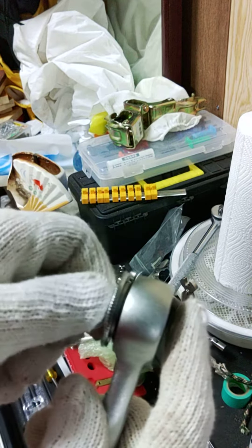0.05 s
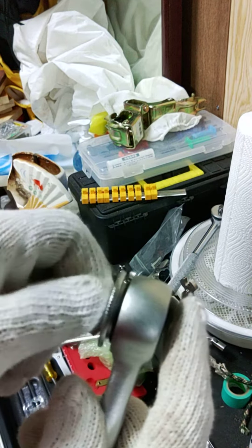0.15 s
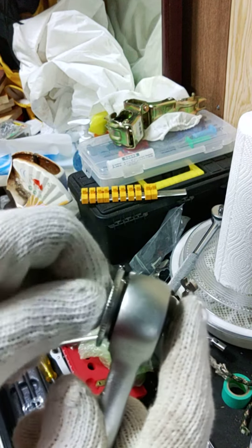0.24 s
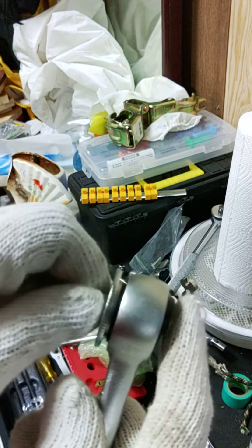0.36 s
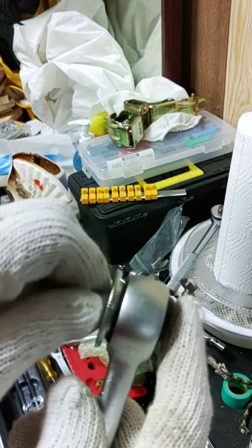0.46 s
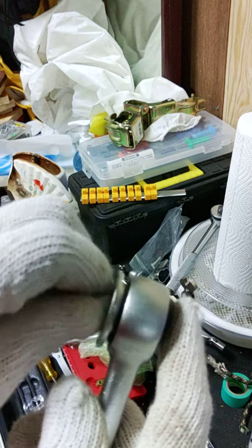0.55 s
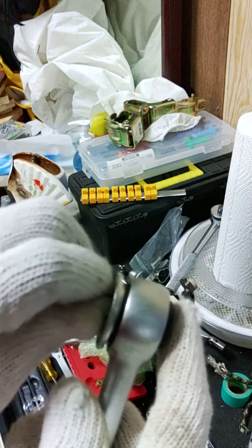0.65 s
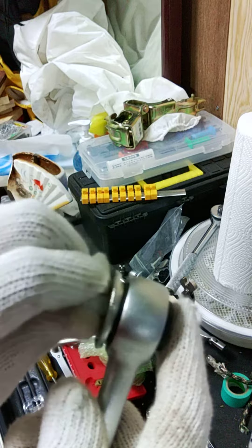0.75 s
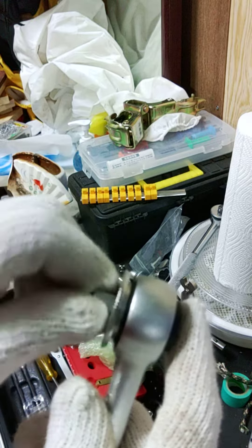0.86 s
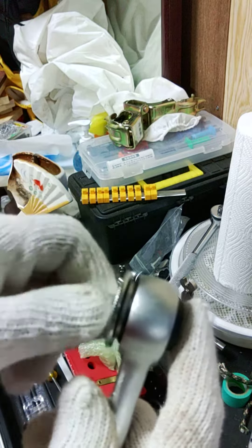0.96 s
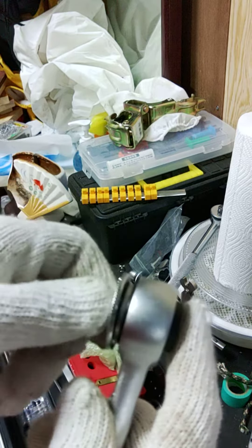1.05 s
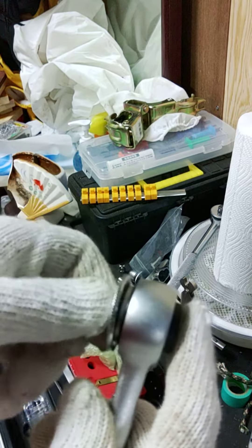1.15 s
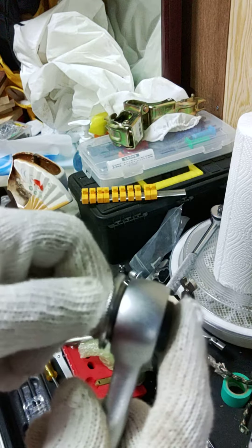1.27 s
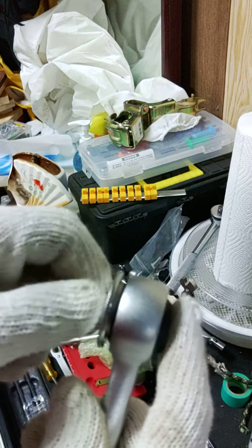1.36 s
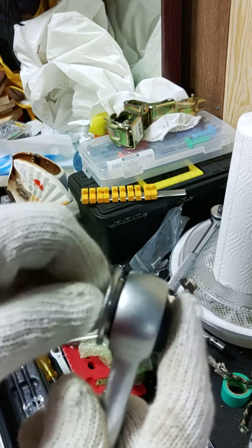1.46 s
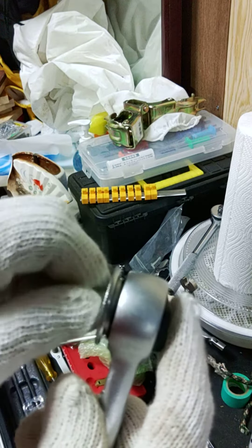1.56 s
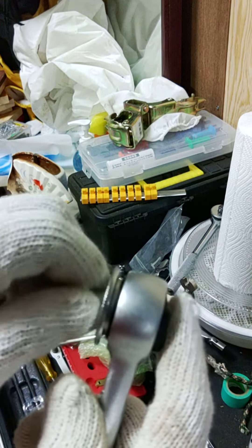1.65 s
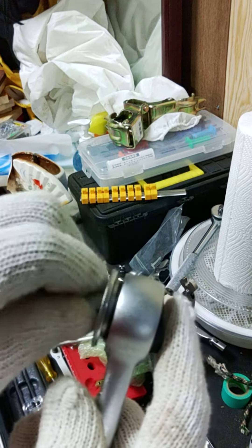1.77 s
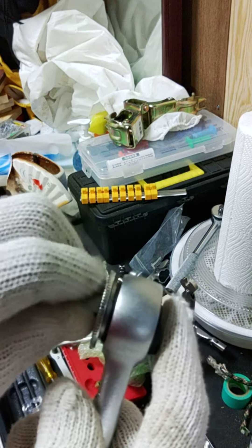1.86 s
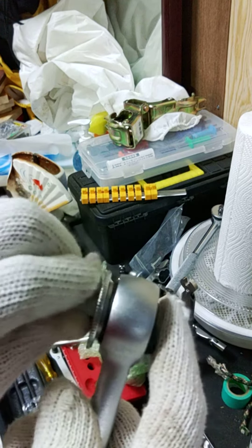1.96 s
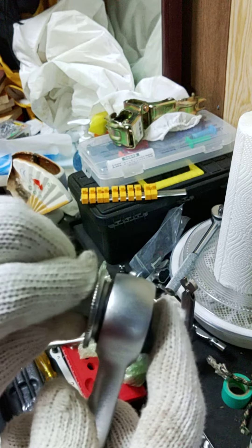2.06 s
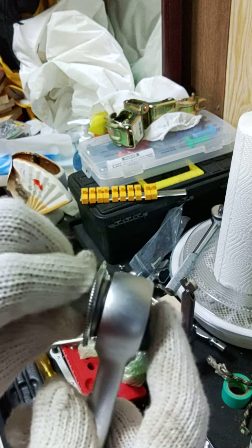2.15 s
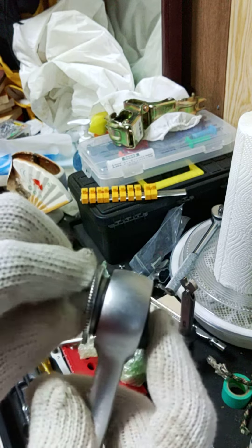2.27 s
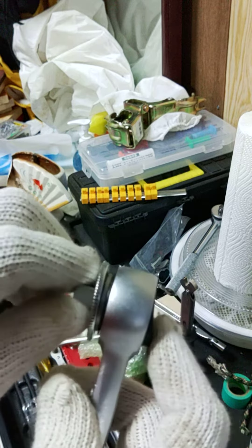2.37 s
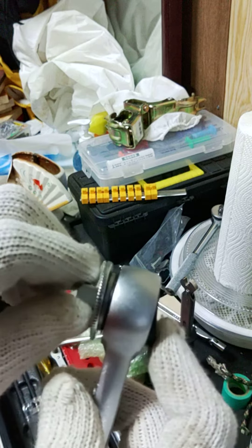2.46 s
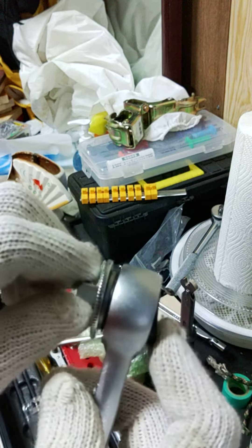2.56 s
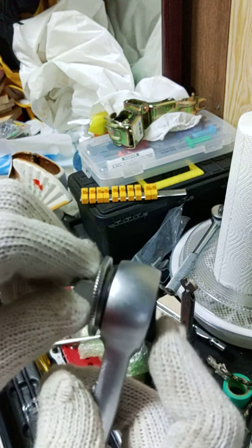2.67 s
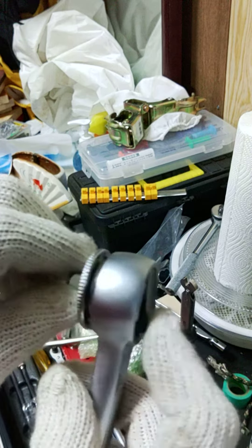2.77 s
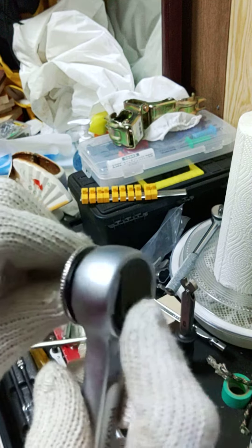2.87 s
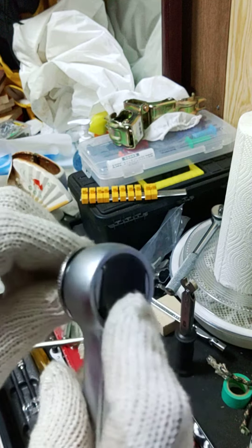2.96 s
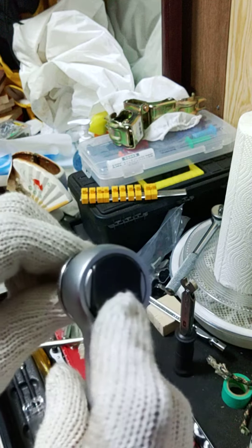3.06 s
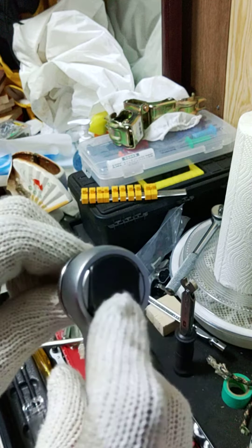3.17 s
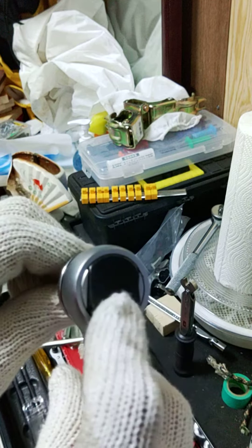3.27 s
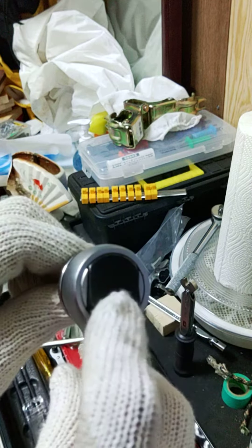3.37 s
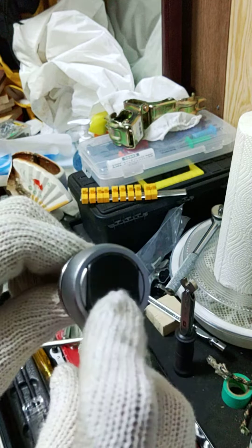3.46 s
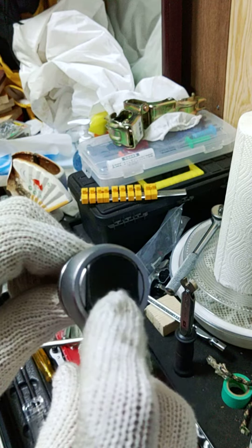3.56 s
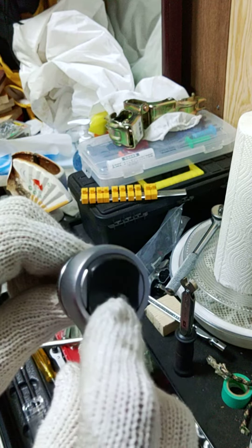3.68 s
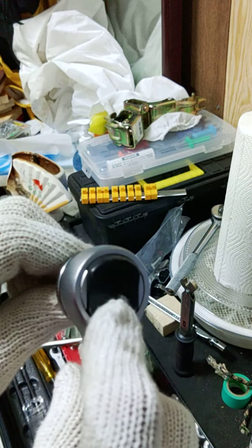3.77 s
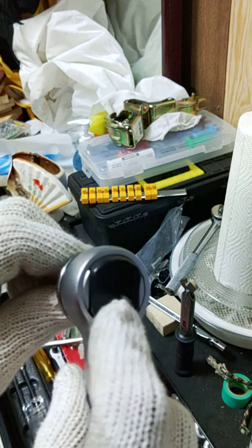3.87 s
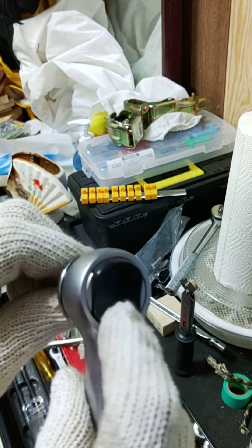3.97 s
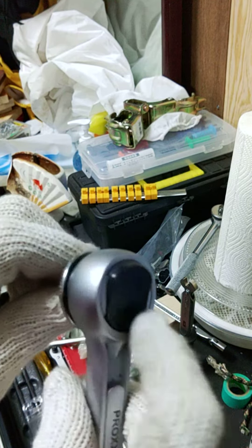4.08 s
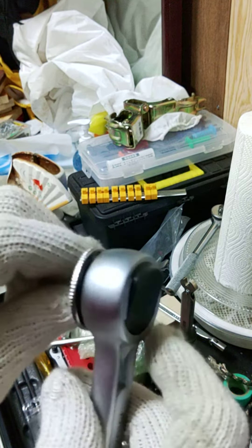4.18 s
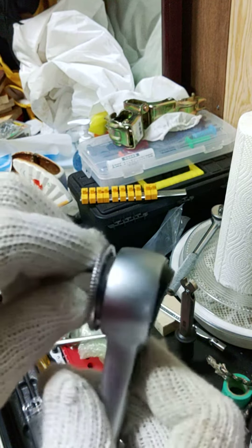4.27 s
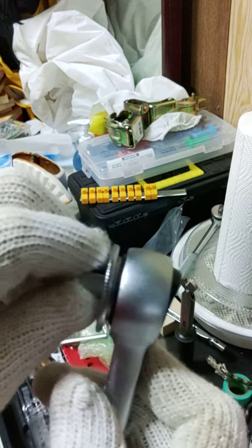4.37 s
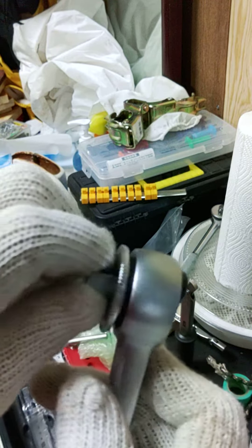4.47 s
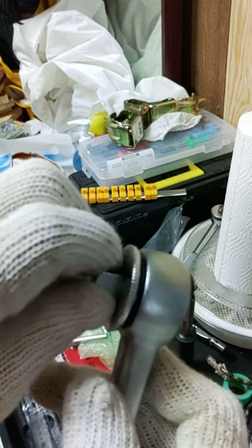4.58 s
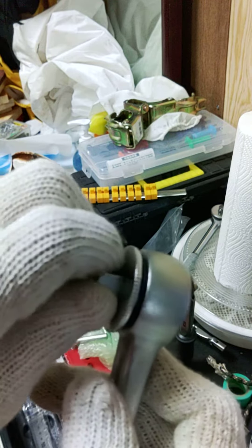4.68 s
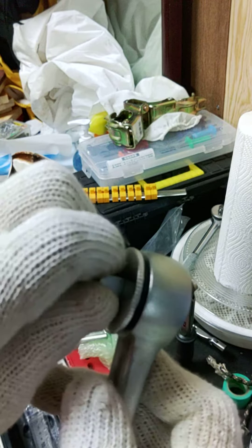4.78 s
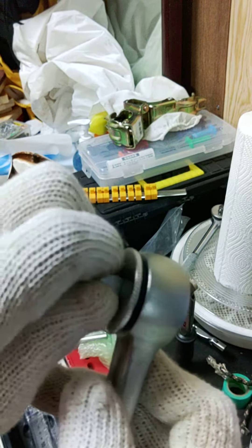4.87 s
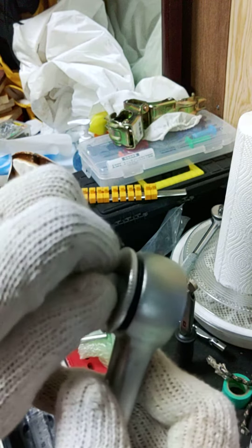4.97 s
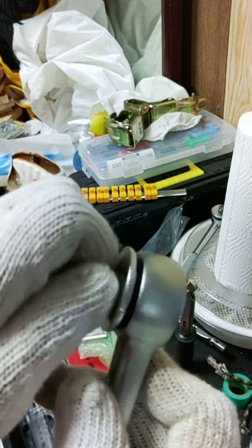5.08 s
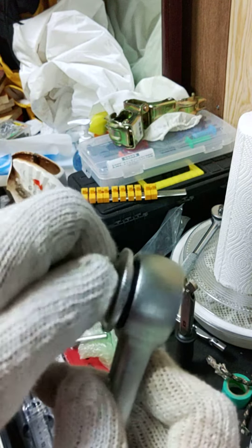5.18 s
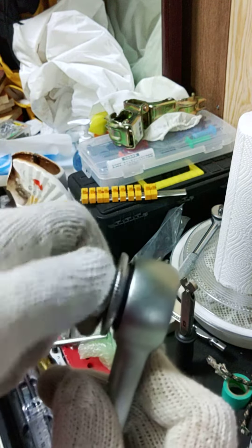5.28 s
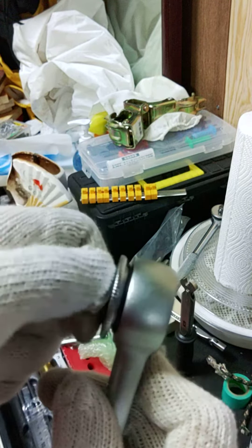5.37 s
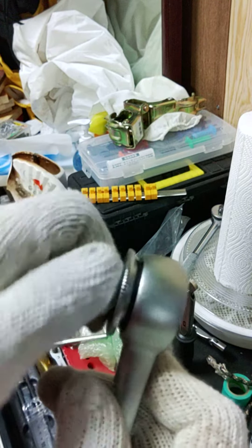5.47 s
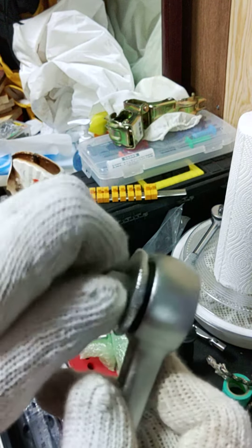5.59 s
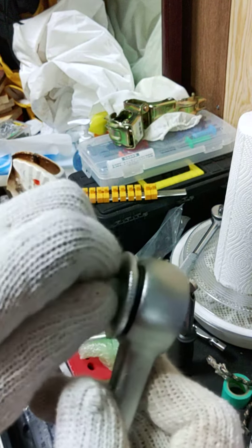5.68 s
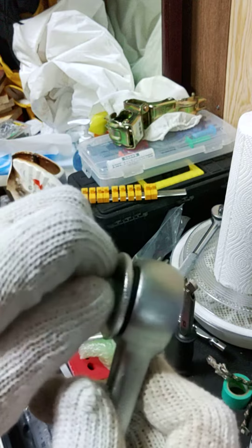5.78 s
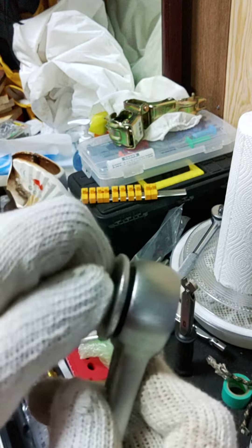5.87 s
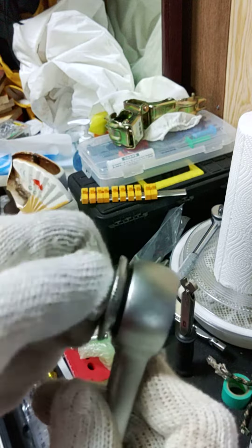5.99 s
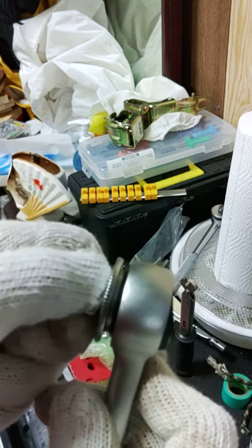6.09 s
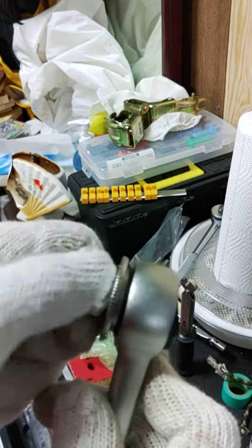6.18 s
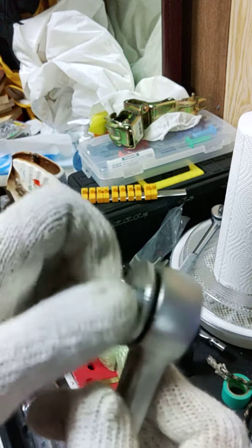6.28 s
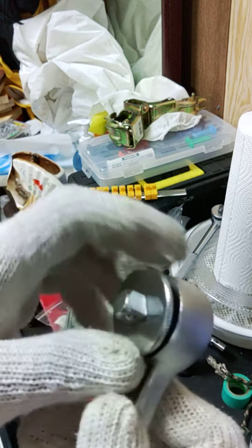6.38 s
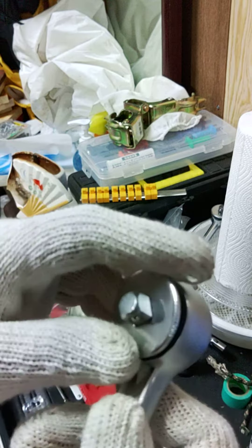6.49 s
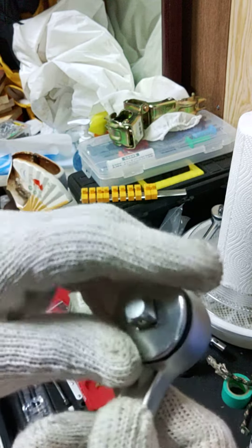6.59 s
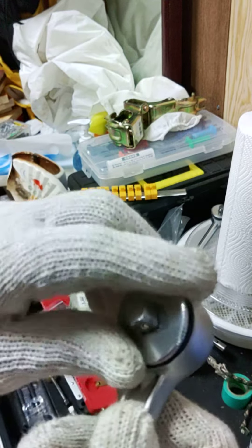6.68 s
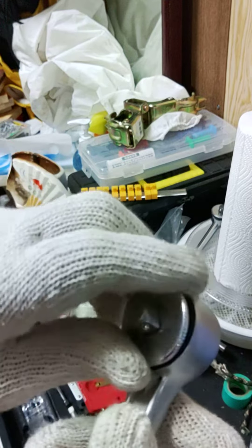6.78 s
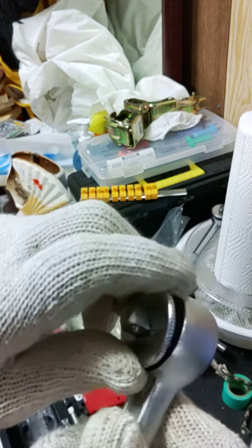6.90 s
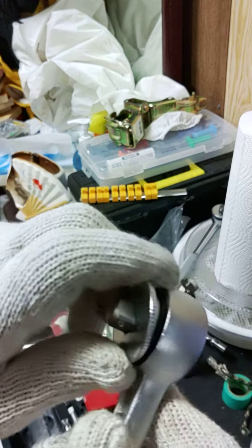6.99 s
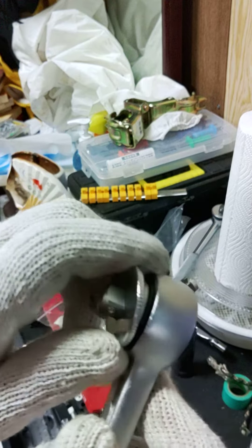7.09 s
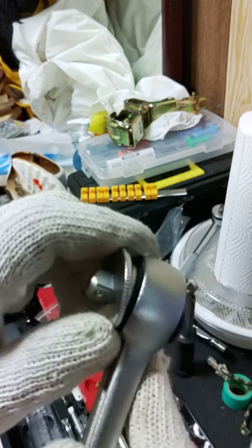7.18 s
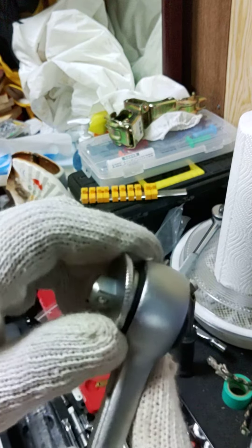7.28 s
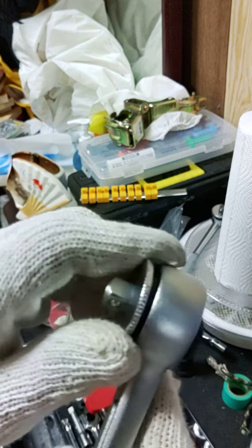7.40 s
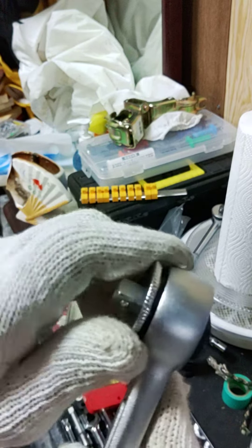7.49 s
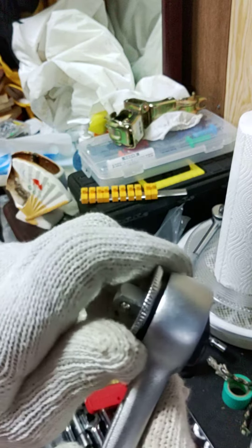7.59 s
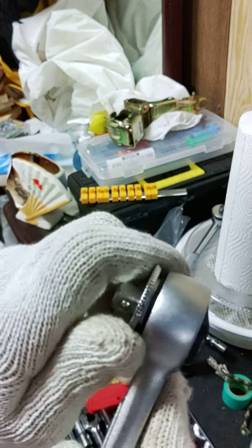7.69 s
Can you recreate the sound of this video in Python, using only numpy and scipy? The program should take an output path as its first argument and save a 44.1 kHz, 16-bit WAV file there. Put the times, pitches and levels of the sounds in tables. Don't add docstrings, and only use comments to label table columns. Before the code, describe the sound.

Crisp pawl clicks, dry and high with little body, arrive in five groups. The first two are moderate, around ten clicks each; after a hard double snap come a quickening run and a louder rapid one, then a pair at the end. Gloves rub softly on steel, air puffs low at the close microphone, and faint tyre roar rises outside the small cluttered room.

```python
import sys
import numpy as np
from scipy import signal
from scipy.fft import rfft, irfft
from scipy.io import wavfile
from scipy.ndimage import uniform_filter1d

SR = 44100
rng = np.random.default_rng(int(sys.argv[2]) if len(sys.argv) > 2 else 0)


def wav_record(signal):
    frames = np.transpose(np.atleast_2d(signal))
    bounded = np.clip(frames, -1, 1)
    quanta = np.round(bounded * 32767).astype(np.int16)
    wavfile.write(sys.argv[1], SR, quanta)


def invert_db(level):
    return 10 ** (np.asarray(level, dtype=float) / 20)


N = 341334

# frequency in Hz, level in dB.
AIR_COLOUR = [(4, 2.5), (12, 16), (25, -3.5), (45, -2), (70, -56)]
DRONE_COLOUR = [(35, 5.5), (60, 2), (120, -0.5), (190, -8.5), (280, -6), (450, -15), (650, -33)]
TYRE_COLOUR = [(350, 1), (600, 1.5), (780, 1), (920, 1), (1150, -0.5), (1800, -7.5), (3000, -18.5),
               (5000, -55.5)]
WHINE_COLOUR = [(780, -43), (880, -7.5), (950, -3), (1030, -5.5), (1150, -40)]
# centre in seconds, length in seconds, level in dB.
PUFFS = [(0.03, 0.2, -47), (.67, 0.027, -58), (2.25, 0.24, -58.5), (2.87, 0.12, -61), (3.5, 0.02, -52),
         (4.68, 0.086, -49.5), (5.62, .08, -46.5), (6.08, 0.064, -32), (6.26, 0.11, -35), (6.77, 0.15, -48),
         (7.55, 0.08, -42)]
# time in seconds, tyre roar in dB.
VEHICLE = [(0, -71), (1.5, -69.5), (2.8, -68.5), (4.0, -65), (4.9, -60.5), (5.7, -61), (6.35, -53.5),
           (7.0, -57), (7.74, -60)]
# frequency in Hz, level in dB.
RUSTLE_COLOUR = [(9000, -24.5), (11500, -23), (12500, -11.5), (14500, -8), (15600, -16.5), (16200, -43)]
RUB_COLOUR = [(1180, -42.5), (2000, -10.5), (4810, -3.5), (5370, -7.5), (6890, -2.5), (8970, -2.5),
              (11500, -14.5), (15000, -40)]
# centre in seconds, length in seconds, fine rustle in dB, coarse rub in dB.
SLIDES = [(.98, 0.3, -72, -73), (2.31, 0.11, -75, -81), (2.822, 0.045, -72, -80), (3.02, 0.14, -70, -70),
          (4.162, 0.096, -70.5, -73), (4.55, 0.31, -81.5, -87), (5.537, 0.065, -70, -70),
          (6.35, .2, -69, -77), (6.878, 0.29, -77, -83), (7.246, 0.13, -66, -68.5),
          (7.49, 0.093, -57, -55.5), (7.664, 0.048, -69, -60.5)]
# fine level in dB, coarse level in dB.
HOLD_DB = (-80.5, -90.5)
# time in seconds, peak level in dB.
STROKES = [
    [(0.1911, -12.5), (0.265, -12.5), (0.3079, -12), (0.3702, -14.5), (0.4166, -12.5), (0.4929, -13.5),
     (0.5668, -14), (0.6057, -14), (0.6576, -17), (0.6955, -17), (0.7404, -17.5)],
    [(1.3517, -16), (1.3851, -16.5), (1.4799, -17.5), (1.5188, -17.5), (1.6046, -15.5), (1.686, -16),
     (1.7633, -13), (1.8236, -14), (1.9035, -14), (1.9558, -15), (2.0162, -14), (2.1015, -14.5)],
    [(4.8542, -14), (4.9091, -13), (4.9585, -13.5), (4.9999, -13.5), (5.0418, -11), (5.1061, -11),
     (5.1565, -10), (5.2149, -13), (5.2443, -12), (5.2772, -12.5), (5.3107, -12.5), (5.3336, -13),
     (5.3511, -12.5), (5.3725, -13)],
    [(5.8107, -11.5), (5.8471, -12), (5.9055, -9.5), (5.9274, -14), (5.9494, -10), (5.9723, -13),
     (5.9953, -10), (6.0187, -13.5), (6.0437, -14.5), (6.0721, -13), (6.1225, -10.5)],
    [(7.6237, -10.5), (7.725, -8.5)],
]
# level of the slip in dB, change of the hops in dB.
GRIPS = [(-44, -2.5), (-22, -5), (-34, -2), (-34, -1), (-38, -1.5)]
# thud, body and gear in dB, drift of body and of gear in dB/s.
STROKE_WEIGHTS = [(-45.5, -40.5, -29, -1.5, -9.5), (-47, -40, -37, -6.5, 6.5), (-42.5, -38, -28, 3, -6),
                  (-43.5, -34.5, -29.5, -18.5, -12), (-45, -39.5, -31.5, -1.5, -5)]
# delay in seconds, level in dB, length in seconds.
HOPS = [(.0046, -13, .0003), (.0079, -6, .0003), (.0111, -8, .0003)]
# frequency in Hz, level in dB.
SNAP_COLOUR = [(1200, -45), (2200, -16.5), (3500, -31.5), (5500, -4), (8500, -2), (12500, -27), (15000, 3),
               (16500, -8)]
# frequency in Hz, T60 in seconds, level in dB in each stroke.
THUD_MODES = [(1140, 0.015, -11.5, -27, -14, -3.5, -9), (1460, 0.025, 30, 12.5, -2.5, 14.5, 0),
              (2120, 0.01, -25.5, -4, -4.5, 10, 3)]
BODY_MODES = [(2760, 0.0092, -32.5, 4, -30, -37, -9), (3220, 0.0079, 3.5, 10, 6, 11.5, -4),
              (3624, 0.016, -8.5, 0.5, 3, -8, -10), (4030, 0.029, -8.5, 2, 4.5, 11, -4),
              (4640, 0.012, -30, 0, 6, 7.5, -10)]
GEAR_MODES = [(5525, 0.0068, -4, -52, -12.5, -7.5, -10), (6530, 0.024, -7, -6.5, -10.5, -31, -23),
              (7000, 0.0061, 2.5, -1, -6.5, 5.5, -2), (7680, 0.0057, -9, -12, -10, -36, -20),
              (8340, 0.0081, 12.5, -5, 3, 4.5, 3), (8850, 0.011, 7.5, -4, 3, 1.5, 0),
              (9460, 0.021, -6.5, -3, 2.5, -12, 4.5)]
PAWL_MODES = [(10455, 0.0032, -4, -34, -9, 9, 7), (11030, 0.0045, -12.5, 12, -9, -3.5, 3),
              (11850, 0.0038, -15, -2, -9, 10, 13.5), (12620, 0.011, -3, -23, -1.5, 9.5, 6),
              (13370, 0.0015, -25.5, 26.5, -17, -2, -1.5), (14700, 0.0024, 0, 9, 1.5, 15, 19),
              (14700, 0.003, -10.5, 7.5, -27, -19, 2.5), (15480, .004, -21, -26, -31, -10.5, -0.5)]
PART_TRIM_DB = (-2, 11, 14, 3.5)
STROKE_RING_DB = (-43, -39, -50, -50, -56)
# frequency in Hz, T60 in seconds, level in dB.
LOW_RING = [(6525, 0.22, 10), (7165, 0.11, -13)]
HIGH_RING = [(11880, .045, 0), (11915, .16, -10), (12040, .16, -10), (12120, .045, -4), (12750, .02, -20)]
BODY_RING = [(3090, .026, 0), (2800, .009, -7), (1000, .04, -30), (1800, .014, -30), (3700, .008, -5),
             (4800, .008, -5)]
# frequency in Hz, T60 in seconds, level in dB.
HANDLE_RING = [(3950, .1, -46), (4110, .12, -43)]
# time in seconds, crack peak in dB, low, high and body ring in dB.
TICKS = [(1.08, -58, -75, -75, -54), (2.776, -53.5, -85, -94, -81), (2.939, -50, -82, -71, -68),
         (3.6945, -17, -52, -24, -34.5), (3.6965, -6.5, -42, -22, -25), (4.163, -54, -78, -65, -62),
         (4.492, -49.5, -84, -84, -77), (7.446, -31.5, -90, -62, -58), (7.487, -39, -90, -54, -72),
         (7.509, -33, -90, -51, -77)]
SCRAPES = [(2.978, -48, -53.5, -45.5, -55.5), (3.7, -13, -39, -13, -33), (6.371, -43, -59, -35.5, -42),
           (6.389, -49, -39, -39, -47), (6.413, -49, -70, -44, -47), (6.4195, -40, -60, -31, -58),
           (6.426, -22, -43.5, -14.5, -45), (6.682, -42.5, -90, -65, -42.5)]
# frequency in Hz, level in dB.
CRACK_COLOUR = [(1100, -48), (2300, -36), (3000, -13), (6000, -9), (9000, -5), (12000, -4), (15000, -1),
                (16300, -25)]
# time in seconds, level in dB, frequency in
# Hz, T60 in seconds.
SINGLE_MODES = [(5.812, -37, 7000, 0.08), (5.848, -37, 7000, .11), (3.697, -47.5, 300, .03),
                (3.697, -44.5, 1001, 0.067), (7.445, -39.5, 2450, .012), (6.426, -51, 1800, 0.045),
                (6.686, -32.5, 5330, 0.0076), (6.685, -41.5, 7165, 0.043), (6.69, -51, 7000, 0.091),
                (7.444, -43, 244, 0.048), (7.445, -44.5, 370, 0.037), (7.446, -45, 515, 0.031)]
# band centre in Hz, T60 in seconds, level in dB.
ROOM_BANDS = [(1200, 0.33, -28), (3200, 0.23, -22), (5200, 0.18, -25.5), (7000, 0.21, -20),
              (9700, 0.19, -20.5), (14150, 0.18, -20.5)]
# frequency in Hz, level in dB.
MIC_HISS = [(1000, -72.5), (3000, -72.5), (6000, -79), (10000, -76.5), (16000, -74.5)]


def colour(x, points):
    hz, db = np.transpose(points)
    f = np.fft.rfftfreq(x.shape[-1], 1 / SR) + 1
    gain = invert_db(np.interp(np.log(f), np.log(hz), db, -120, db[-1]))
    return irfft(rfft(x) * gain, x.shape[-1])


def unit(x):
    return x / np.abs(x).max(axis=-1, keepdims=True)


def highpass(x, hz):
    return signal.sosfilt(signal.butter(4, hz, "high", fs=SR, output="sos"), x)


def decay(t, t60):
    return np.exp(-np.log(1000) * t / t60)


def ring(hz, t60, db, size):
    t = np.arange(size) / SR
    hz, t60, db = (np.asarray(v)[..., None] for v in (hz, t60, db))
    return (invert_db(db) * decay(t, t60) * np.sin(2 * np.pi * hz * t)).sum(axis=-2)


def add(track, s, sound):
    i = int(s * SR)
    track[i:i + len(sound)] += sound[:N - i]


def walk(rate):
    k = int(SR / rate)
    held = np.repeat(rng.standard_normal(N // k + 1), k)
    return uniform_filter1d(uniform_filter1d(held, k), k)[:N]


def hiss(points, gain, rate, patchy_db):
    x = colour(rng.standard_normal(N), points)
    return x / x.std() * gain * invert_db(patchy_db * walk(rate))


def swells(rows, rest_db):
    t = np.arange(N) / SR
    return invert_db(rest_db) + sum(invert_db(db) * np.exp(-((t - s) / length) ** 2) for s, length, db in rows)


def stirred_air():
    return hiss(AIR_COLOUR, swells(PUFFS, -49.5), rate=6, patchy_db=2.5)


def passing_vehicle():
    roar_db = np.interp(np.arange(N) / SR, *np.transpose(VEHICLE))
    swell_db = roar_db + 71
    drone = hiss(DRONE_COLOUR, invert_db(-67 + 0.62 * swell_db), rate=7, patchy_db=1.8)
    whine = hiss(WHINE_COLOUR, invert_db(-108 + 2.5 * swell_db), rate=5, patchy_db=5.0)
    tyres = hiss(TYRE_COLOUR, invert_db(roar_db - 5.5), rate=11, patchy_db=2.4)
    return drone + whine + tyres


def gloves():
    slides = np.array(SLIDES)
    fine = swells(slides[:, [0, 1, 2]], HOLD_DB[0])
    coarse = swells(slides[:, [0, 1, 3]], HOLD_DB[1])
    return hiss(RUSTLE_COLOUR, fine, rate=16, patchy_db=4.5) + hiss(RUB_COLOUR, coarse, rate=90, patchy_db=2.5)


SLIP_S = .009


def contact(slip_db, hop_db):
    rise_s, seat_s, settle_s, settle_db = .0003, .0023, .008, -10.5
    slip_lead_s, slip_length_s = .0048, .0018
    t = np.arange(1536) / SR - SLIP_S
    after = np.maximum(t, 0)
    seating = np.exp(-(after / seat_s) ** 3)
    rattle = invert_db(settle_db) * np.exp(-after / settle_s)
    force = (1 - np.exp(-(after / rise_s) ** 2)) * (seating + rattle)
    slip_gain = invert_db(slip_db + 3 * rng.standard_normal())
    force += slip_gain * np.exp(-((t + slip_lead_s) / slip_length_s) ** 2)
    for s, db, length in HOPS:
        louder, later = rng.standard_normal(2)
        hop = np.exp(-((t - s - .00015 * later) / length) ** 2)
        force += invert_db(db + hop_db + 2.5 * louder) * hop
    return force * rng.standard_normal(len(t))


def head_part(part, grip, touch):
    glove_t60_s = .01
    hz, t60, *grips = np.transpose(part)[..., None]
    detune, scatter = rng.standard_normal((2, len(part), 1))
    response = ring(hz * (1 + .008 * detune), np.minimum(t60, glove_t60_s), 0 * hz, size=1024)
    modes = signal.fftconvolve(touch[None], response)
    modes *= invert_db(grips[grip] + 1.5 * scatter) / modes.std(axis=1, keepdims=True)
    return unit(highpass(modes.sum(axis=0), 0.81 * hz.min()))


def pawl_drops():
    out = np.zeros(N)
    low_ring = highpass(ring(*np.transpose(LOW_RING), size=16384), 7400)
    handle = highpass(ring(*np.transpose(HANDLE_RING), size=8192), 3000)
    parts = THUD_MODES, BODY_MODES, GEAR_MODES, PAWL_MODES
    for grip, stroke in enumerate(STROKES):
        thud_db, body_db, gear_db, body_drift, gear_drift = STROKE_WEIGHTS[grip]
        for s, peak_db in stroke:
            touch = contact(*GRIPS[grip])
            start = s - SLIP_S
            add(out, start, invert_db(peak_db - 13) * unit(colour(touch, SNAP_COLOUR)))
            since = s - stroke[0][0]
            levels = thud_db, body_db + body_drift * since, gear_db + gear_drift * since, peak_db
            for part, db, trim_db in zip(parts, levels, PART_TRIM_DB):
                add(out, start, invert_db(db + trim_db) * head_part(part, grip, touch))
            add(out, s, invert_db(peak_db + STROKE_RING_DB[grip]) * low_ring)
            add(out, s, invert_db(peak_db) * handle)
    return out


def knocks():
    cracks, rings = np.zeros(N), np.zeros(N)
    t = np.arange(2048) / SR
    fade = np.cos(np.pi / 2 * t / t[-1]) ** 2
    for rows, length in ((TICKS, .002), (SCRAPES, .004)):
        for s, crack_db, *ring_db in rows:
            envelope = np.exp(-t / length) * (1 - np.exp(-t / (0.27 * length)))
            burst = rng.standard_normal(len(t)) * envelope
            add(cracks, s, invert_db(crack_db) * unit(colour(burst, CRACK_COLOUR)) * fade)
            for db, modes in zip(ring_db, (LOW_RING, HIGH_RING, BODY_RING)):
                hz, t60, mode_db = np.transpose(modes)[..., None]
                driven = signal.fftconvolve(burst[None], ring(hz, t60, 0 * hz, size=12000))
                free = (unit(driven) * invert_db(mode_db)).sum(axis=0)
                add(rings, s, invert_db(db) * unit(highpass(free, .8 * hz.min())))
    return cracks, rings


def single_modes():
    out = np.zeros(N)
    onset = 1 - np.exp(-np.arange(4096) / SR / .001)
    for s, db, hz, t60 in SINGLE_MODES:
        add(out, s, ring([hz], [t60], [db], size=4096) * onset)
    return out


def room(x):
    t = np.arange(16384) / SR
    f, centres = np.fft.rfftfreq(len(t), 1 / SR), np.transpose(ROOM_BANDS)[0]
    build_up = 1 - np.exp(-t / .003)
    answer = np.zeros(len(t))
    for k, (hz, t60, db) in enumerate(ROOM_BANDS):
        share = np.interp(f, centres, np.arange(len(ROOM_BANDS)) == k)
        band = irfft(rfft(rng.standard_normal(len(t))) * np.sqrt(share), len(t))
        answer += invert_db(db - 16.5) * band * decay(t, t60) * build_up
    return signal.fftconvolve(x, answer)[:N]


def scene():
    background = stirred_air() + passing_vehicle() + gloves()
    clicks = pawl_drops()
    cracks, rings = knocks()
    rings += single_modes()
    blur, share = walk(2000), .92
    scatter = np.sqrt(1 - share) + np.sqrt(share) * blur / blur.std()
    sent = (clicks + cracks) * scatter + invert_db(-7) * rings
    return (clicks + cracks + rings + room(sent) + background)[None]


def top_cut(x):
    return signal.sosfilt(signal.butter(12, 16810, fs=SR, output="sos"), x)


def record(dry):
    x = dry + colour(rng.standard_normal(N), MIC_HISS)
    mix = signal.sosfilt(signal.cheby1(8, .5, 15650, fs=SR, output="sos"), x)
    return top_cut(mix)


dry = scene()
out = record(dry)
wav_record(out)
```